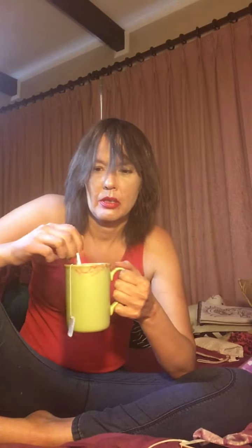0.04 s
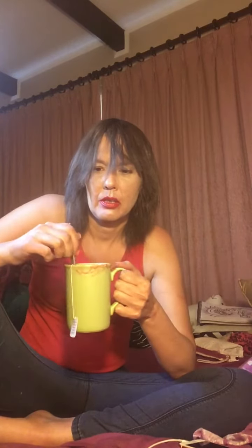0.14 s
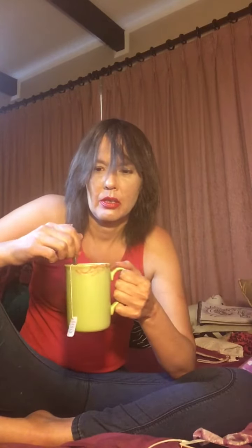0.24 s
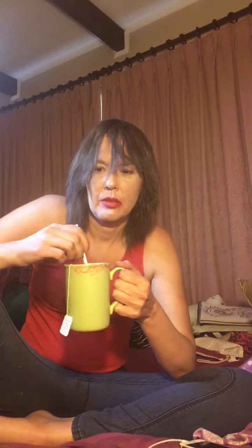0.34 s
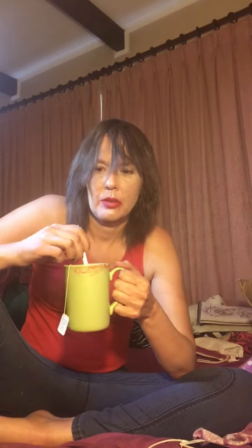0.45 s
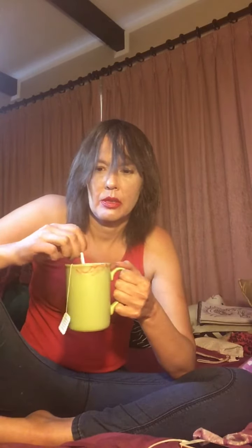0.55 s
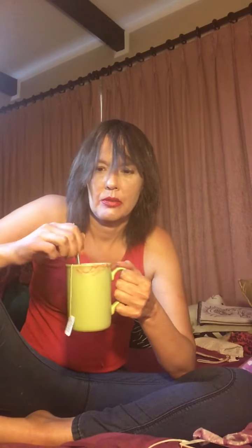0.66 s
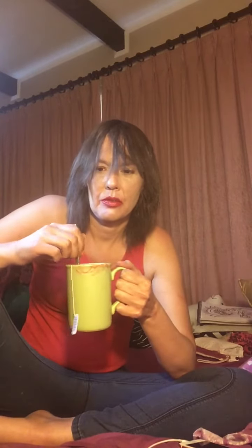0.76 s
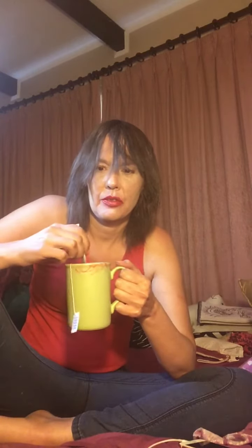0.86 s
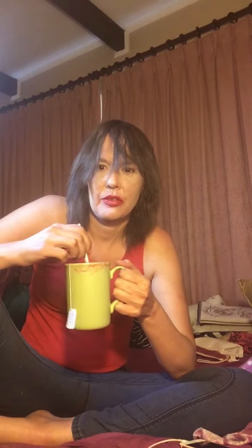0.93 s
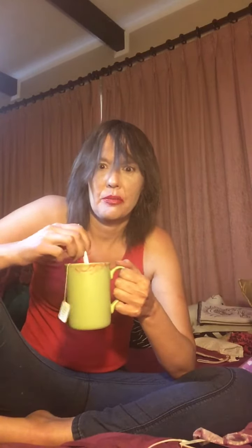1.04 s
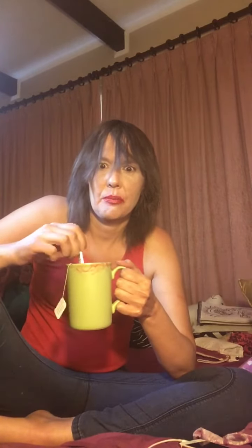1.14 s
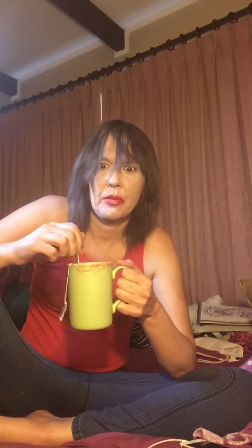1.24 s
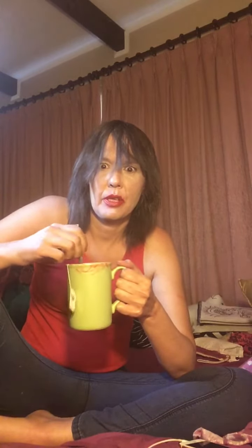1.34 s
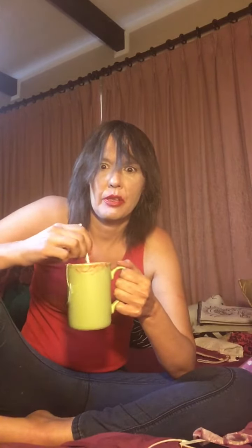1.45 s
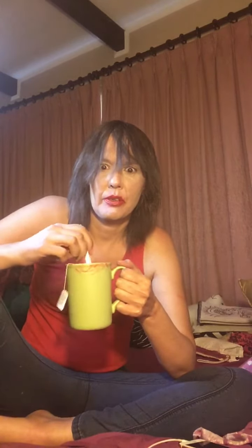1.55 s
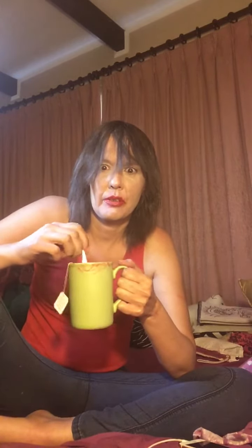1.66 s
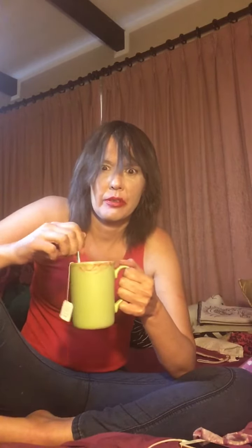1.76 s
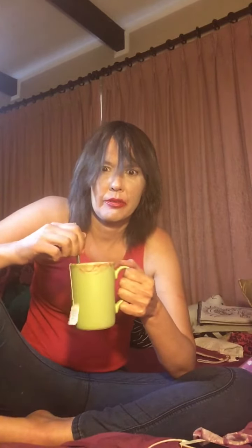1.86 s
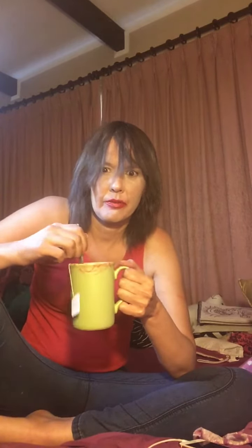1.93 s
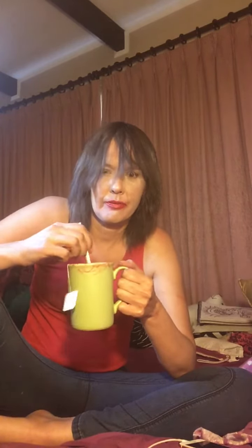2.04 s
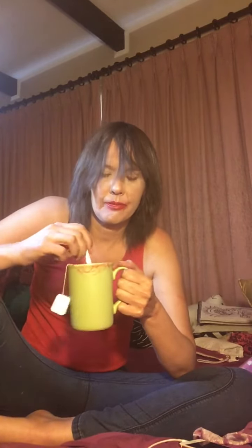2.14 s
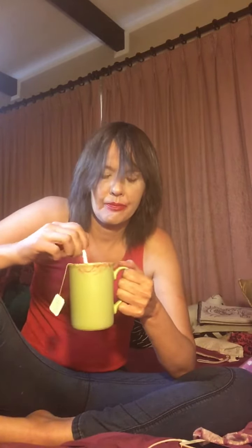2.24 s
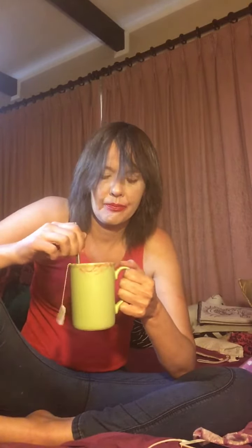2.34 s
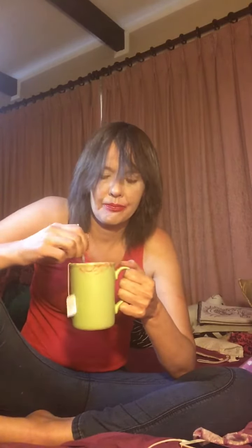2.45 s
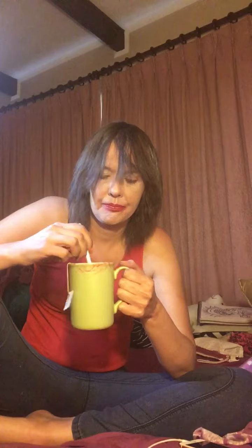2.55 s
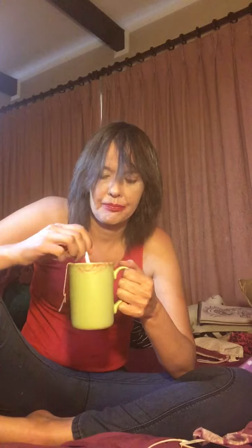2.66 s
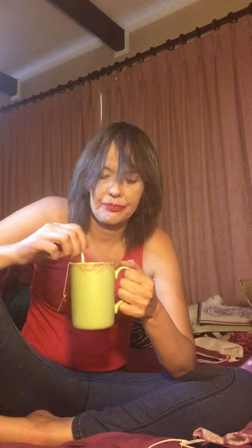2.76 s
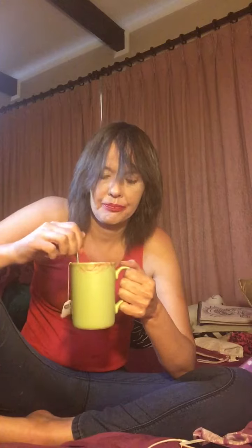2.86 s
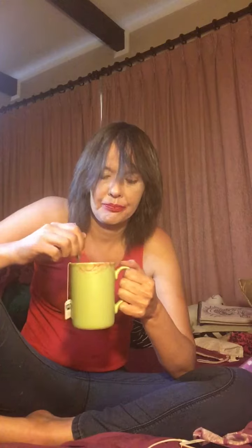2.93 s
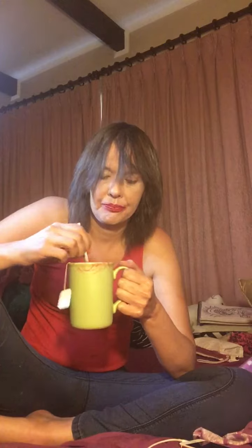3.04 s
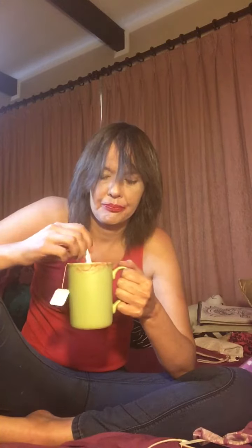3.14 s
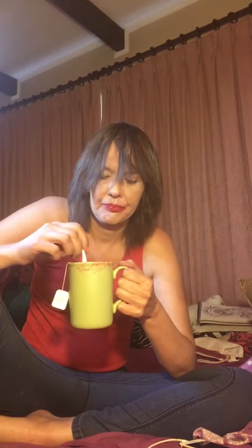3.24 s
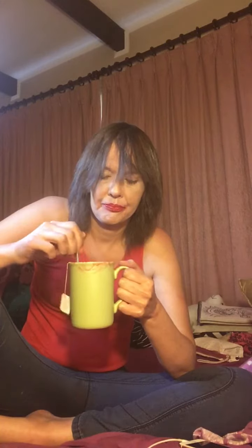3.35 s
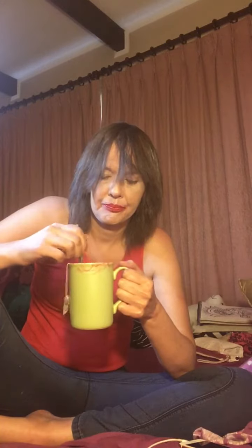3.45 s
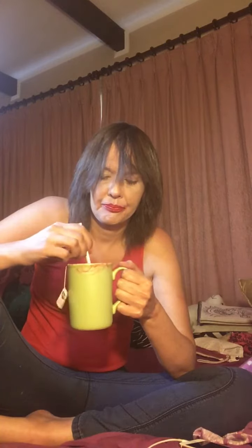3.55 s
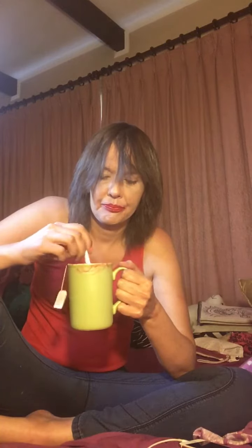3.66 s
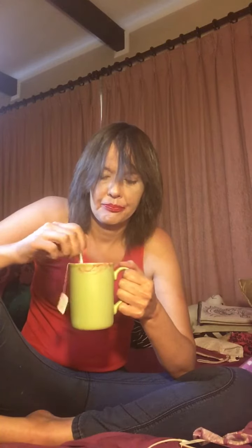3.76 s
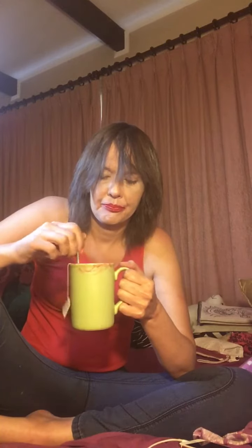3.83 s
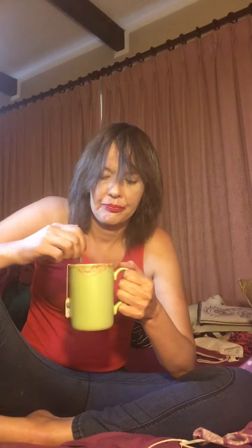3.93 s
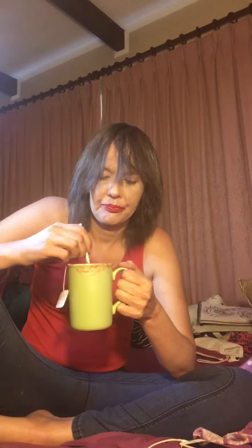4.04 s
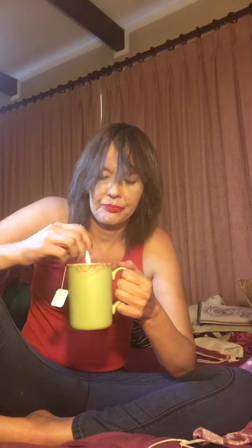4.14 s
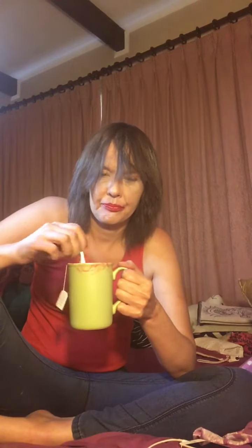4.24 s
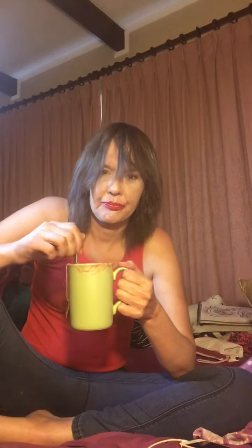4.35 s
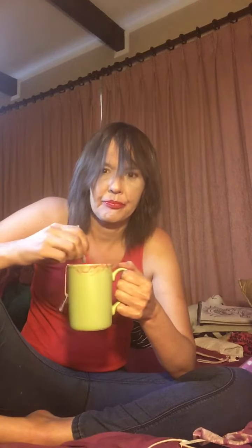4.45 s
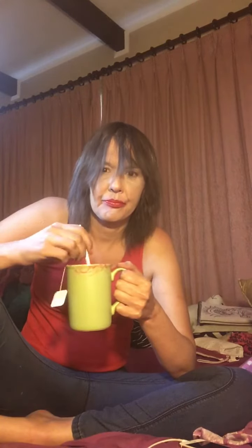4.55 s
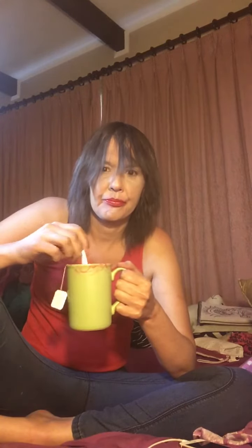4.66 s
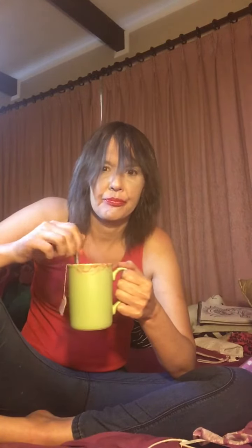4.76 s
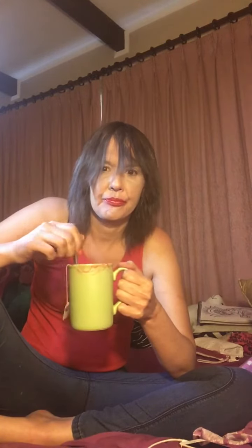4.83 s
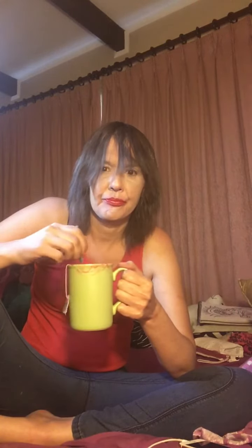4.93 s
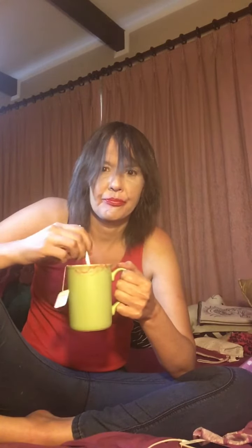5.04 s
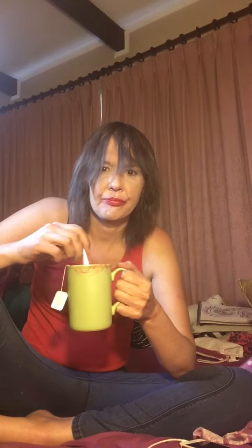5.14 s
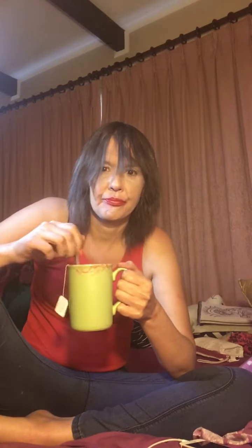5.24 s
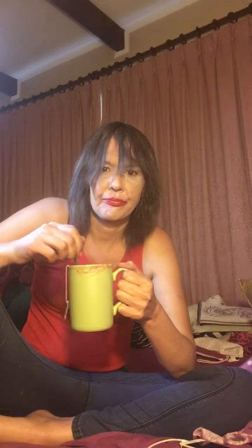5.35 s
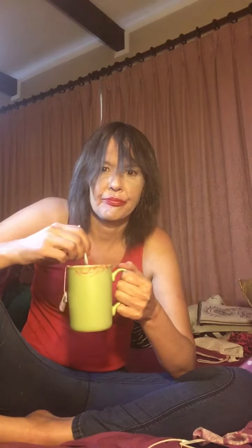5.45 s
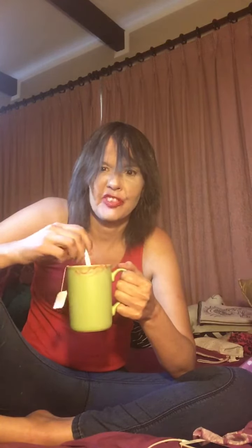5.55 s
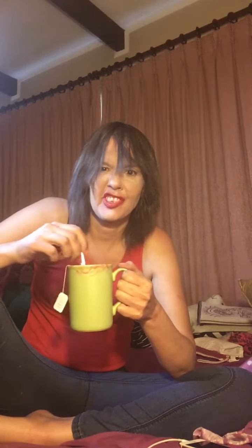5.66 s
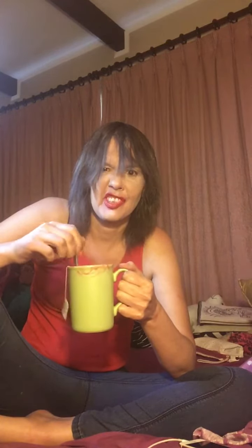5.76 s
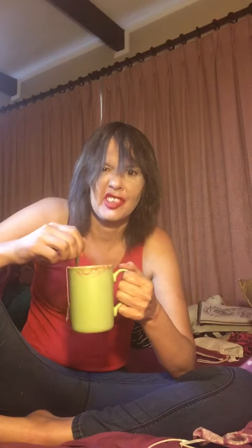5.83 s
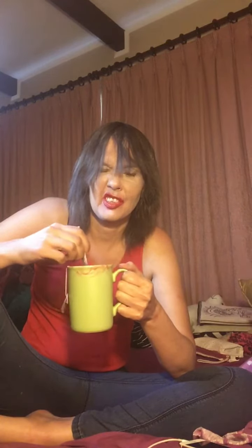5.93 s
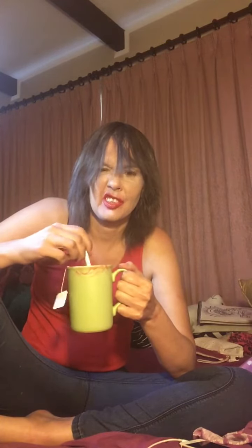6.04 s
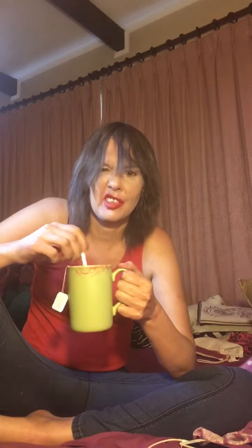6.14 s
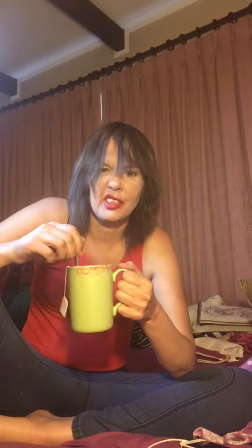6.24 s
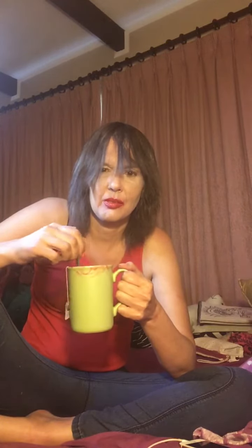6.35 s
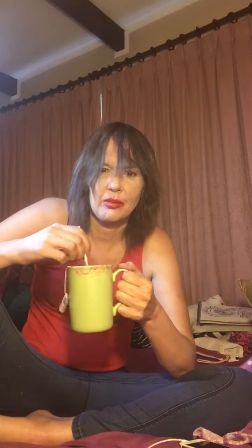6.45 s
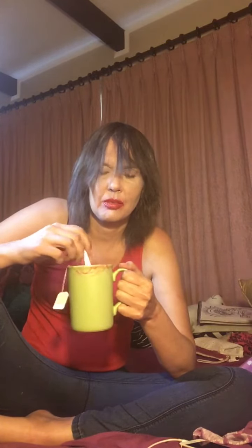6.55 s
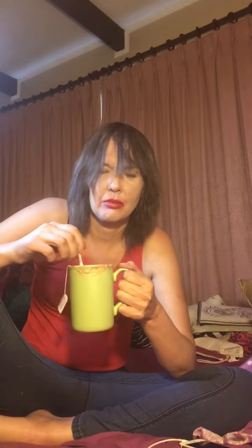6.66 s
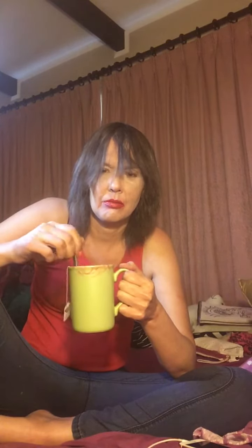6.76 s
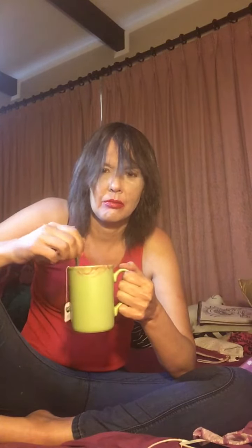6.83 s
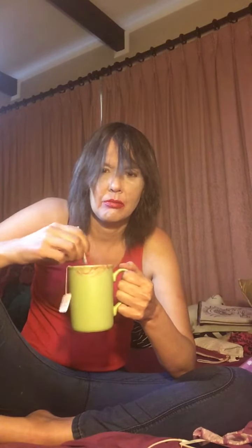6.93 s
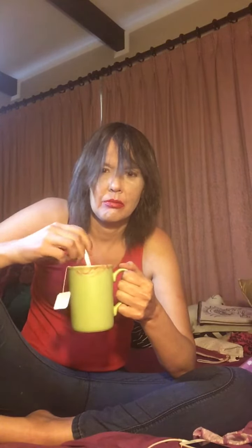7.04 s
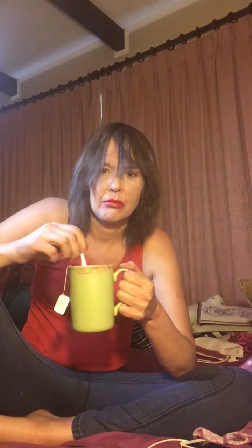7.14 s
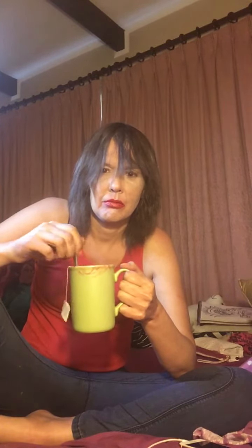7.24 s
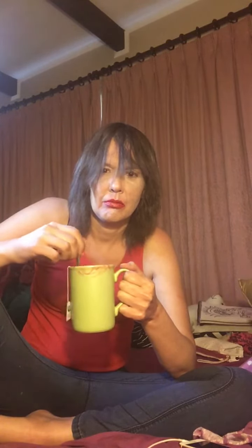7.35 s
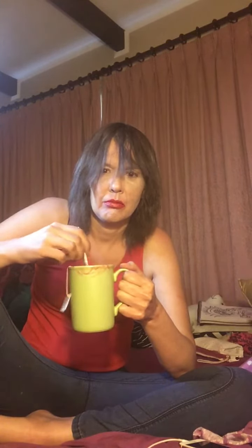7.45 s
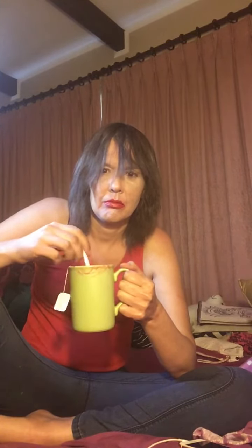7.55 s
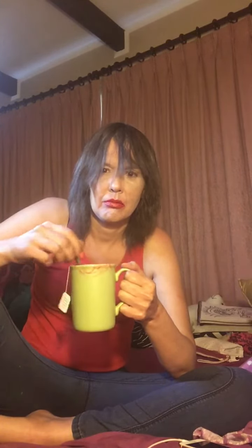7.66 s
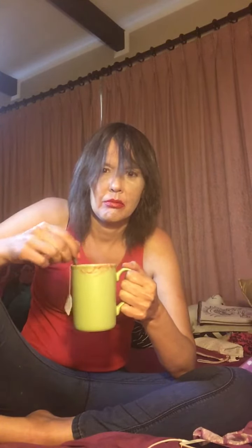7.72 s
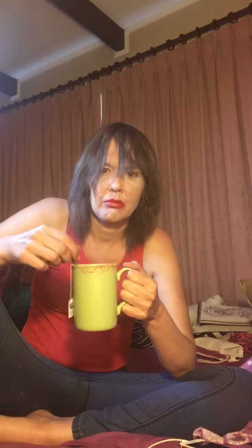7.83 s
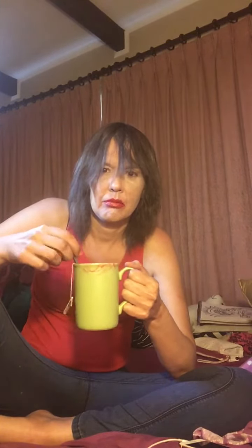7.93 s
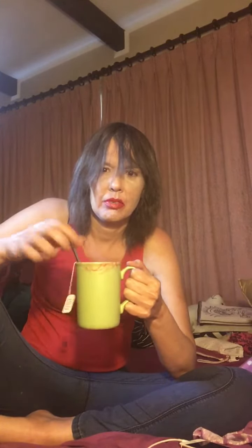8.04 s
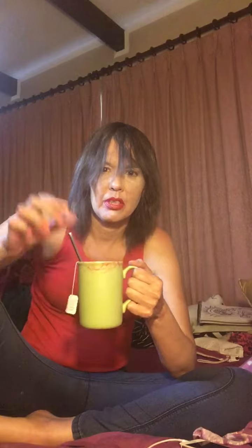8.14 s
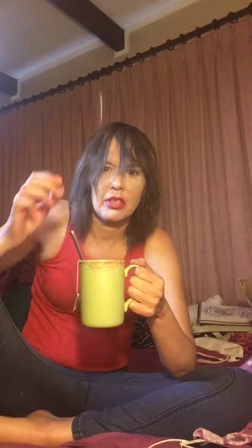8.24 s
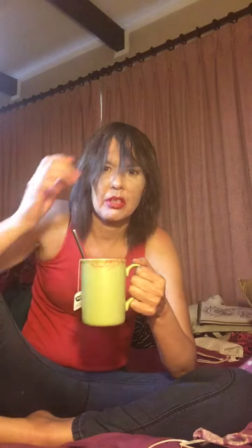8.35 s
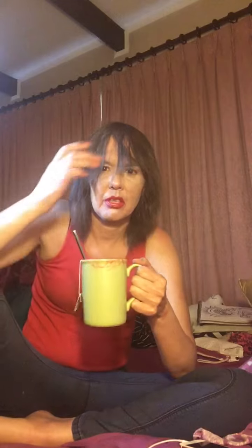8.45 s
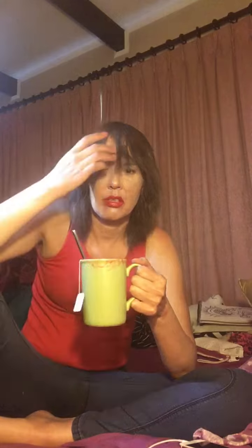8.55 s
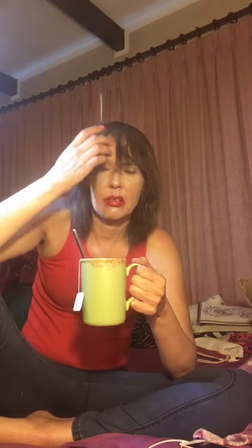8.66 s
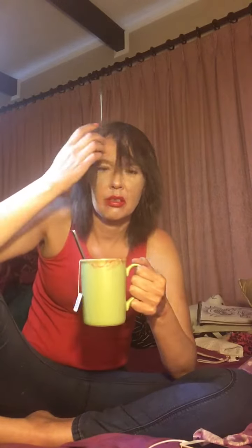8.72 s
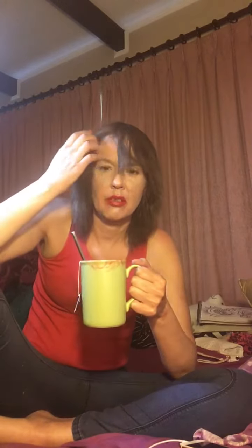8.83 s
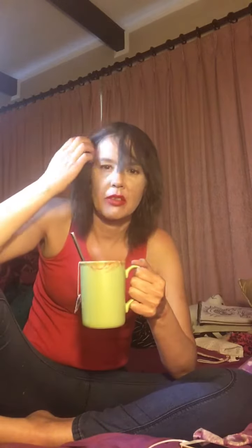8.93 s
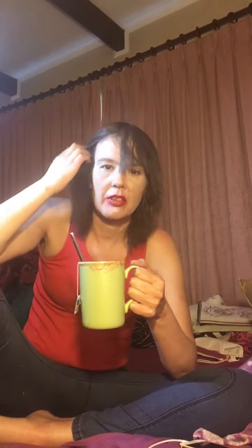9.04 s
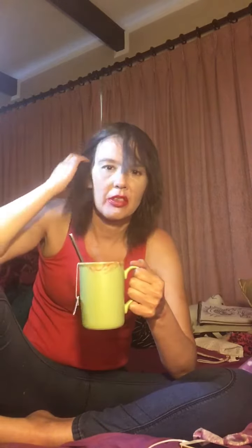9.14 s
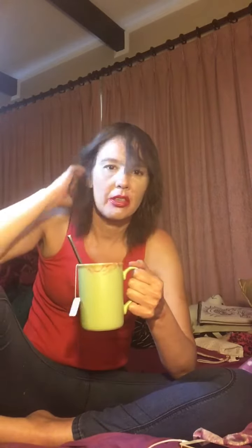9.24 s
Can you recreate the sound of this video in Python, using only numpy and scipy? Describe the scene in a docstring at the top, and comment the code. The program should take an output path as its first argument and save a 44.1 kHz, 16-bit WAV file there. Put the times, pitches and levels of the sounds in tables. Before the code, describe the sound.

A metal spoon circles in a full ceramic mug, rasping softly along the wall about four times a second while the tea swishes faintly. Two sharp clinks stand out early, followed by lighter, uneven ones. Near the end the spoon falls against the rim with a quick clatter and the stirring stops. The bedroom is quiet, with a faint ticking clock, low rumble and microphone hiss.

```python
"""Spoon stirring a mug of tea.

A steel spoon knocks the wall of a full ceramic mug, drags along it between knocks, then falls against
the rim. Knocks and rasp ring the same damped modes; the tea swishes behind the spoon. In the quiet,
curtained bedroom a clock ticks, something snaps faintly and a low rumble wavers under microphone hiss."""
import sys
import numpy as np
from scipy import signal
from scipy.fft import rfft, irfft, next_fast_len
from scipy.io import wavfile
from scipy.ndimage import uniform_filter1d, map_coordinates

SR = 44100
rng = np.random.default_rng(int(sys.argv[2]) if len(sys.argv) > 2 else 0)


def output_pcm(signal):
    """Save a mono or channel-first signal as 16-bit PCM at the path in sys.argv[1].

    Samples are clipped to [-1, 1] before scaling.
    """
    pcm = np.clip(np.atleast_2d(signal).T, -1, 1) * 32767
    wavfile.write(sys.argv[1], SR, np.round(pcm).astype(np.int16))


N = 409688

# Bedroom decay. Each row: frequency in Hz, T60 in seconds.
ROOM_DECAY = [(700, 0.35), (2000, 0.26), (6000, 0.27), (13000, 0.17)]
# Noise spectra. Each row: frequency in Hz, relative density in dB.
RUMBLE_SPECTRUM = [(21, -42), (35, -11.5), (92, 4), (130, -3.5), (232, -6), (290, -9.5), (450, -20),
                   (580, -28.5), (990, -120)]
HISS_SPECTRUM = [(210, -26), (350, -2.5), (482, -11.5), (602, -7.5), (842, -12), (2580, -11.5), (9000, -18),
                 (14500, -23.5), (15900, -54)]
SWISH_SPECTRUM = [(500, -6.5), (1100, 3), (1500, 3.5), (2500, -13.5)]
# Rumble swells. Each row: centre in seconds, half-width in seconds, added level in dB.
RUMBLE_SWELLS = [(.5, 0.11, -63), (.69, 0.047, -54), (2.09, 0.14, -66.5), (3.67, 0.027, -63),
                 (6.94, 0.05, -55.5)]
# Clock case resonances. Each row: frequency in Hz, bandwidth in Hz, relative level in dB.
CASE_MODES = [(760, 260, -2), (1250, 500, -4)]
# Dry snaps. Each row: start in seconds, level before the high-pass in dB.
SNAP_EVENTS = [(8.177, -52), (8.708, -57)]
# Modes of mug and spoon, damped by tea and hands.
# Each row: frequency in Hz, relative level in dB, T60 in seconds before the cycle limit.
MUG_MODES = [(1290, -14.5, 0.025), (1854, -11, 0.038), (1990, -6.5, 0.072), (2060, -9.5, 0.094),
             (2185, -9, 0.022), (2570, -8.5, 0.018), (2900, -7, 0.036), (3325, -21.5, 0.052),
             (3650, -23, 0.031), (3994, -19, 0.064), (4627, -16.5, 0.09), (5543, -12.5, 0.092),
             (5892, -6, 0.032), (6320, -2.5, 0.099), (6570, -8, 0.052), (7400, -4, 0.12),
             (7960, 14.5, 0.0018), (9120, 0.5, 0.016), (10570, -2, 0.029), (8410, -4, 0.032),
             (12520, -3.5, 0.03), (13900, -2.5, 0.0066)]
# Sweeps along the glaze, duller one way round, brighter the other.
# Each row: start in seconds, length in seconds, peak gain of low modes in dB, of middle modes in dB.
SPOON_SWEEPS = [(-.14, 0.29, -49.5, -53), (0.105, 0.24, -62.5, -72), (0.453, 0.21, -55.5, -58.5),
                (0.688, 0.37, -61, -73), (1.012, 0.26, -51.5, -55), (1.253, 0.23, -62.5, -71.5),
                (1.508, 0.056, -55, -60.5), (1.551, 0.29, -54.5, -56.5), (1.816, 0.29, -54.5, -63.5),
                (2.067, 0.25, -53, -58), (2.363, 0.21, -67, -67), (2.597, 0.31, -51.5, -53),
                (2.88, 0.26, -51, -59.5), (3.104, 0.31, -52, -51), (3.393, 0.25, -51, -60.5),
                (3.631, 0.23, -50, -50.5), (3.856, 0.26, -48.5, -58.5), (4.105, 0.27, -51, -53),
                (4.331, 0.32, -50.5, -60), (4.576, 0.32, -52, -53.5), (4.872, 0.23, -51.5, -59),
                (5.057, 0.27, -54.5, -54.5), (5.31, 0.26, -51.5, -62), (5.541, 0.25, -52, -55.5),
                (5.809, 0.23, -53.5, -64), (6.003, 0.27, -55.5, -59.5), (6.26, 0.42, -60, -66),
                (6.547, 0.28, -52.5, -56), (6.822, 0.17, -51.5, -62), (6.979, 0.32, -52.5, -57),
                (7.273, 0.3, -53, -64), (7.526, 0.19, -56, -57.5)]
# Knocks on the mug. Each row: start in seconds, dry peak of middle modes in dB, low and high modes
# relative to that in dB, frequency favoured by the struck spot in Hz.
SPOON_KNOCKS = [(0.2713, -28.5, 6.5, 3, 1980), (0.2952, -35.5, 3, 0, 2027),
                (0.4283, -16, -15.5, -6.5, 5890), (0.445, -33.5, 2.5, 7, 4600), (0.876, -16, -8, -3, 2077),
                (1.033, -44, -3.5, -7, 5530), (1.6069, -33, 0, -3, 6030), (1.719, -41, -15, -6, 6170),
                (1.8091, -43.5, 9.5, 1, 2800), (1.822, -34.5, -1, -4.5, 1950), (2.0968, -39, 1.5, 0, 2890),
                (2.4261, -30.5, 4, 1, 1986), (2.4474, -52, 11, -13, 1960), (2.593, -42.5, 2, -2, 2900),
                (2.893, -46.5, 10, -5, 2850), (2.904, -40, 3, -5, 4090), (3.122, -48, 4.5, -2, 2900),
                (3.205, -36, 0, -23, 3000), (3.3898, -41, 7, -4, 2836), (3.55, -38.5, -1, -11, 6600),
                (3.629, -42.5, 4.5, -1, 1830), (3.6932, -45.5, 7, -19, 5760), (3.8556, -40.5, 10, -1, 2870),
                (3.9025, -42, 3.5, 1, 4440), (4.1192, -40, 7.5, 0.5, 1303), (4.3892, -33, 2, 2.5, 6070),
                (4.5027, -39, 3, -4, 2060), (4.558, -42, 12, -2, 1300), (4.7915, -39.5, 2, -1, 6430),
                (4.93, -47, 9, -4, 1962), (5.08, -53, 16.5, 1, 1280), (5.2964, -37.5, 2.5, -5, 1920),
                (5.5358, -46.5, 9, 1, 4680), (5.7195, -35, -2.5, 0.5, 6270), (5.779, -54, 13.5, 0, 1918),
                (5.889, -32, 1, -1.5, 2022), (6.047, -45.5, 7.5, 2, 1840), (6.2603, -36.5, 3.5, -2, 1965),
                (6.3962, -31.5, 6.5, 0, 1965), (6.4213, -40, 7, 1, 1990), (6.4381, -32.5, 1, -4, 1963),
                (6.7276, -34.5, -2, -0.5, 6180), (7.2601, -34.5, 2.5, -3.5, 6470),
                (7.543, -45, 6.5, -8, 1900), (7.7191, -39.5, 1, -3, 1320), (7.825, -25.5, 1, 4, 2060),
                (7.9366, -24.5, 0.5, -1.5, 5670), (7.9539, -24, -3, -4, 5970),
                (7.9645, -29.5, 1, 1.5, 7440), (7.974, -29.5, -6, -11, 2070), (7.9811, -38, 4.5, 3, 6100)]

LOW_HZ, HIGH_HZ = 5000, 7000  # borders of the low, middle and high modes


def amp(db):
    """Decibels to gain."""
    return 10 ** (np.asarray(db) / 20)


def unit(x):
    """x at rms 1."""
    return x / np.sqrt(np.mean(x ** 2) + 1e-20)


def along(points, hz):
    """Interpolate (Hz, value) points on a log axis."""
    point_hz, values = np.transpose(points)
    return np.interp(np.log(hz + 1), np.log(point_hz + 1), values)


def wobble(rate_hz):
    """Smooth random curve, rate_hz knots per second."""
    knots = rng.standard_normal(int(N * rate_hz / SR) + 4)
    return map_coordinates(knots, [np.arange(N) * rate_hz / SR])


def filtered(x, response):
    """x filtered by response(hz)."""
    size = next_fast_len(N + SR // 2)
    return irfft(rfft(x, size) * response(np.fft.rfftfreq(size, 1 / SR)), size)[..., :N]


def noise(spectrum):
    """Coloured noise at rms 1."""
    return unit(filtered(rng.standard_normal(N), lambda hz: amp(along(spectrum, hz))))


def bedroom(x, wet_db):
    """x plus a room tail; each frequency decays at its own rate."""
    hz, t, bins = signal.stft(rng.standard_normal(SR // 3), SR, nperseg=256)
    tail = signal.istft(bins * amp(-60 * t / along(ROOM_DECAY, hz)[:, None]), SR, nperseg=256)[1]
    tail = np.pad(tail / np.linalg.norm(tail), (round(.006 * SR), 0))  # nearest wall's delay
    wet = amp(wet_db) * signal.fftconvolve(x, tail)
    return wet + np.pad(x, (0, len(wet) - len(x)))


def noise_floor(rumble_db=-66, hiss_db=-70.5):
    """Wavering rumble with brief swells, plus steady microphone hiss."""
    t = np.arange(N) / SR
    swells = sum(amp(db) * np.exp(-((t - at_s) / width_s) ** 2) for at_s, width_s, db in RUMBLE_SWELLS)
    rumble = unit(amp(1.2 * wobble(5)) * noise(RUMBLE_SPECTRUM))
    return (amp(rumble_db) + swells) * rumble + amp(hiss_db) * noise(HISS_SPECTRUM)


def clock(start_s=.21, period_s=1.002, step_s=0.017, dry_db=-64):
    """Wall clock: each step of the gears rattles softly in a hollow case."""
    def case(f):
        return sum(amp(db) * 1j * f * width / (hz * hz - f * f + 1j * f * width)
                   for hz, width, db in CASE_MODES)

    age = (np.arange(N) / SR - start_s) % period_s / step_s
    rattle = unit(filtered(rng.standard_normal(N), case)) * age * np.exp(1 - age)
    return amp(dry_db) * bedroom(rattle, wet_db=-6)[:N]


def snaps(t60_s=0.0088, highpass_hz=1500):
    """Tiny dry snaps after the spoon comes to rest."""
    t = np.arange(N) / SR
    envelope = sum(amp(db - 60 * np.abs(t - at_s) / t60_s) * (t >= at_s) for at_s, db in SNAP_EVENTS)
    return filtered(envelope * rng.standard_normal(N), lambda hz: hz ** 2 / (hz ** 2 + highpass_hz ** 2))


def sweep_curves(hardest=0.51):
    """Low gain, middle gain and progress (0 to 1) of the sweeps; pressure peaks at progress `hardest`."""
    low, middle, progress = np.zeros((3, N))
    for start_s, length_s, low_db, middle_db in SPOON_SWEEPS:
        span = np.arange(max(round(start_s * SR), 0), round((start_s + length_s) * SR))
        done = np.clip((span / SR - start_s) / length_s, 0, 1)
        swell = (done / hardest) ** hardest * ((1 - done) / (1 - hardest)) ** (1 - hardest)
        low[span] += amp(low_db) * swell ** 3.34
        middle[span] += amp(middle_db) * swell ** 3.46
        progress[span] = done
    return low, middle, progress


def tea(pocket_count=300):
    """Tea swishes unevenly behind the spoon and closes over small air pockets."""
    swirl = np.sqrt(np.abs(uniform_filter1d(sweep_curves()[0], SR // 20)))
    uneven = amp(3 * wobble(9) + 2.5 * wobble(30))
    start, size = rng.random((pocket_count, 2)).T[:, :, None]
    t = np.arange(SR // 20) / SR
    cycles = t * 1500 * .5 ** size  # bigger pockets gulp lower
    gulps = cycles * np.exp(-cycles / 2) * np.sin(2 * np.pi * cycles)
    samples = (start * N).astype(int) + np.arange(len(t))
    pockets = unit(np.bincount(samples.ravel(), gulps.ravel(), minlength=N)[:N])
    return swirl * uneven * (amp(-42.5) * noise(SWISH_SPECTRUM) + amp(-48) * pockets)


def band_of(hz):
    """Band index: 0 low, 1 middle, 2 high."""
    return np.digitize(hz, [LOW_HZ, HIGH_HZ])


def contact_crack(t, db, t60_s):
    """Noise burst of a small hard contact, in three bands: no bass, little air."""
    spectrum = rfft(amp(db - 60 * t / t60_s) * rng.standard_normal(len(t)))
    hz = np.fft.rfftfreq(len(t), 1 / SR)
    spectrum *= hz ** 4 / (hz ** 4 + 1400 ** 4)
    spectrum /= (1 + (hz / 10000) ** 4) * (1 + (hz / 14600) ** 30)
    return np.array([irfft(spectrum * (band_of(hz) == band), len(t)) for band in range(3)])


def mug_response(scatter_db, detune, crack_db, crack_t60_s, build_s, max_cycles,
                 favoured_hz=None, favour_db=7, pitch_shift=0):
    """One blow on the mug: ringing modes plus contact crack, one row per band."""
    t = np.arange(SR // 5) / SR
    hz, db, t60_s = np.transpose(MUG_MODES)[:, :, None]
    t60_s = np.minimum(t60_s, max_cycles / hz)  # tea and grip limit the ring
    strength = amp(db + scatter_db * rng.standard_normal(hz.shape)) * rng.choice([-1, 1], hz.shape)
    # Tilting tea and the resting spoon load the wall.
    tuned_hz = hz * (1 + pitch_shift + detune * rng.standard_normal(hz.shape))
    if favoured_hz:
        nearest = np.argmin(np.abs(np.log(hz / favoured_hz)))
        tuned_hz[nearest] = favoured_hz
        strength[nearest] = amp(db[band_of(hz) == band_of(favoured_hz)].max() + favour_db)
    # The handle splits each mode into a close pair.
    twin_hz = tuned_hz * (1 + .012 * hz / LOW_HZ * rng.standard_normal(hz.shape))
    pairs = (np.sin(2 * np.pi * tuned_hz * t) + np.sin(2 * np.pi * twin_hz * t)) / 2
    modes = strength * amp(-60 * t / t60_s) * pairs
    ring = np.array([modes[band_of(hz[:, 0]) == band].sum(axis=0) for band in range(3)])
    attack = 1 - np.exp(-t / build_s)
    fade = np.cos(np.pi * t / t[-1] / 2) ** 2
    return (ring + contact_crack(t, crack_db, crack_t60_s)) * attack * fade


def spoon_drag(ticks_per_s=6000, glide=.035):
    """The spoon's edge rasps over the glaze: dense ticks ring modes that rise by `glide` per sweep."""
    low, middle, progress = sweep_curves()
    high = amp(-3.0) * middle * (middle / amp(-47.5)) ** 0.066  # harder is brighter
    spots = np.linspace(0, 1, num=8)  # the contact travels round the wall
    contact = np.exp([3 * wobble(6) - ((progress - spot) / .3) ** 2 for spot in spots])
    rasp = np.zeros(N)
    for spot, share in zip(spots, contact / contact.sum(axis=0)):
        fires = rng.random(N) < ticks_per_s / SR
        ticks = fires * rng.standard_normal(N) * amp(1.5 * rng.exponential(size=N))
        pressure = amp(3.3 * wobble(45))
        force = unit(ticks * pressure) * np.sqrt(share)
        bands = mug_response(scatter_db=6, detune=.011, crack_db=8, crack_t60_s=0.008,
                             build_s=0.00079, max_cycles=150, pitch_shift=glide * (spot - .5))
        for gain, response in zip((low, middle, high), bands):
            rasp += signal.oaconvolve(gain * force, response / np.linalg.norm(response))[:N]
    return bedroom(rasp, wet_db=-11)[:N]


def spoon_knocks(light_db=-40):
    """Each knock or rebound meets a new spot, so mode strengths vary; harder ones crack more."""
    out = np.zeros(N + SR)
    for start_s, db, low_db, high_db, favoured_hz in SPOON_KNOCKS:
        harder_db = db - light_db
        build_s = 0.00043 * .5 ** (harder_db / 6.5)  # harder contact builds faster
        bands = mug_response(scatter_db=4, detune=0.0071, crack_db=.25 * harder_db + 2.5,
                             crack_t60_s=0.026, build_s=build_s, max_cycles=340, favoured_hz=favoured_hz)
        bands /= np.abs(bands).max(axis=1, keepdims=True)
        peaks = amp(db + np.array([low_db, 0, high_db]))
        knock = bedroom(peaks @ bands, wet_db=-4.5)
        out[round(start_s * SR):][:len(knock)] += knock
    return out[:N]


def scene():
    """All sources at one microphone."""
    return (spoon_knocks() + spoon_drag() + tea() + clock() + snaps() + noise_floor())[None]


def record(dry):
    """Brick-wall band limit."""
    return filtered(dry, lambda hz: hz < 15900)


dry = scene()
out = record(dry)
output_pcm(out)
```